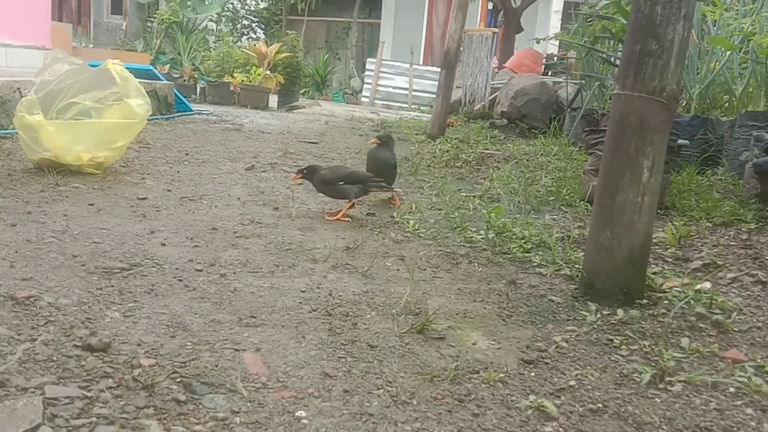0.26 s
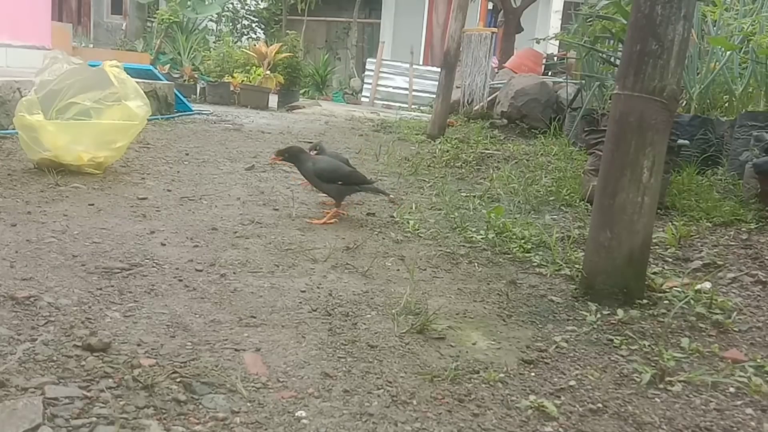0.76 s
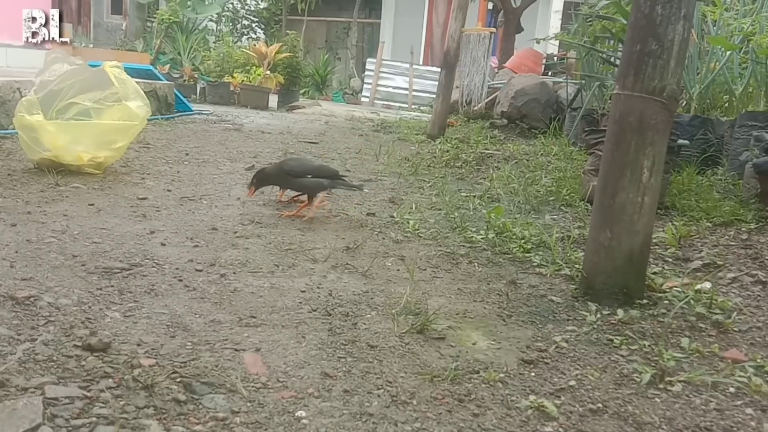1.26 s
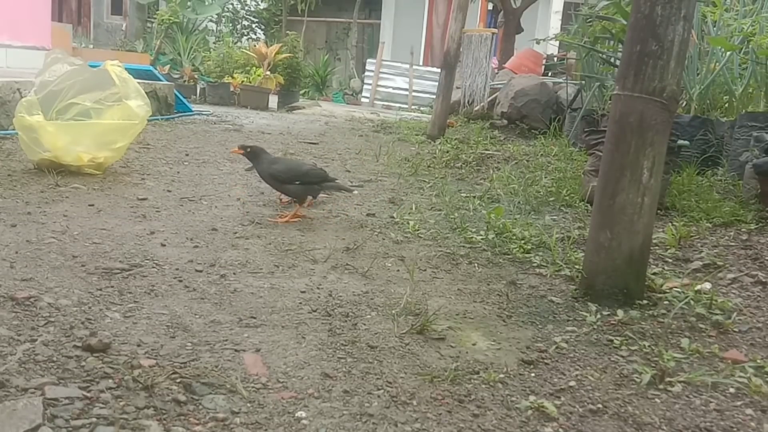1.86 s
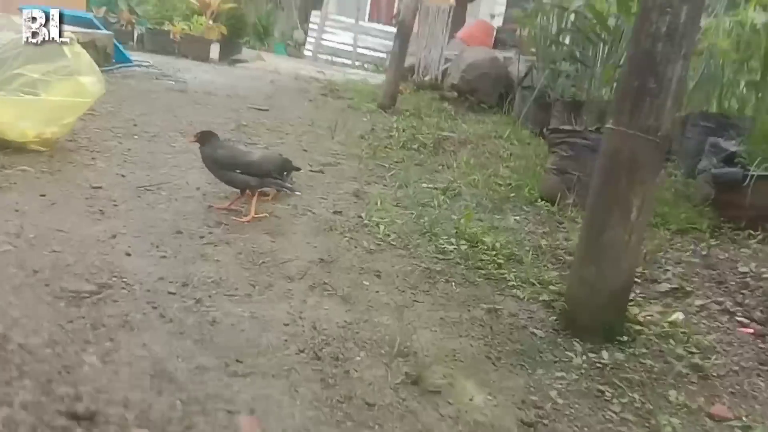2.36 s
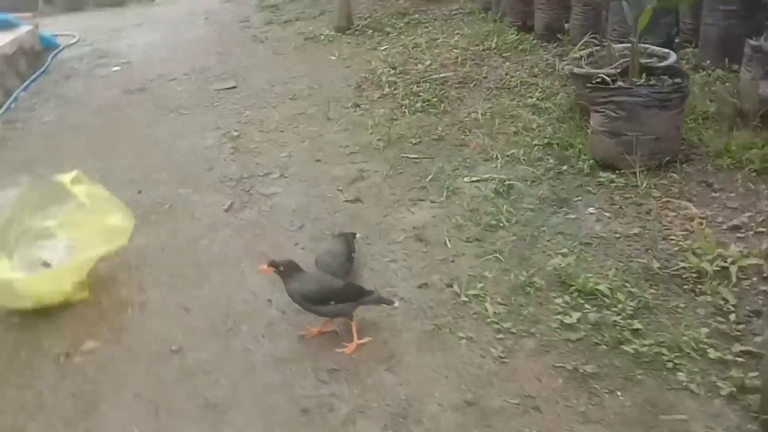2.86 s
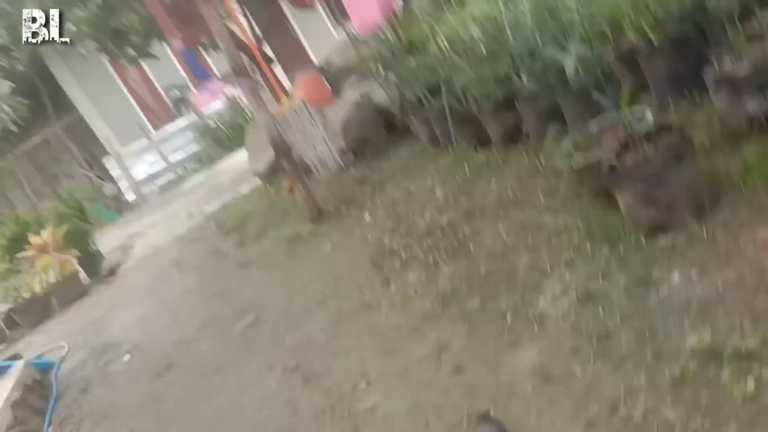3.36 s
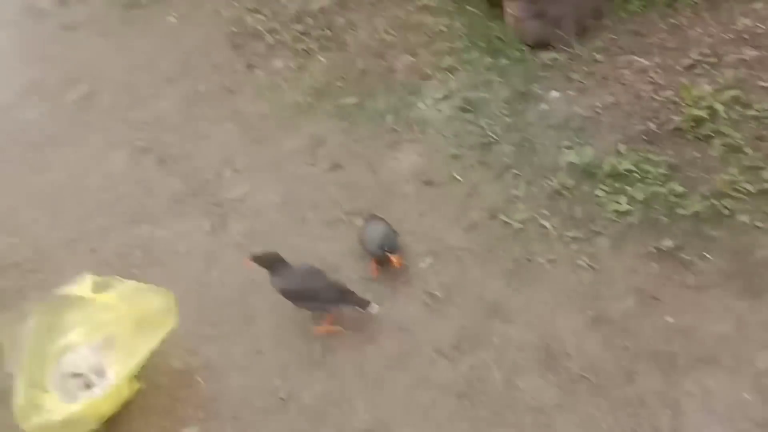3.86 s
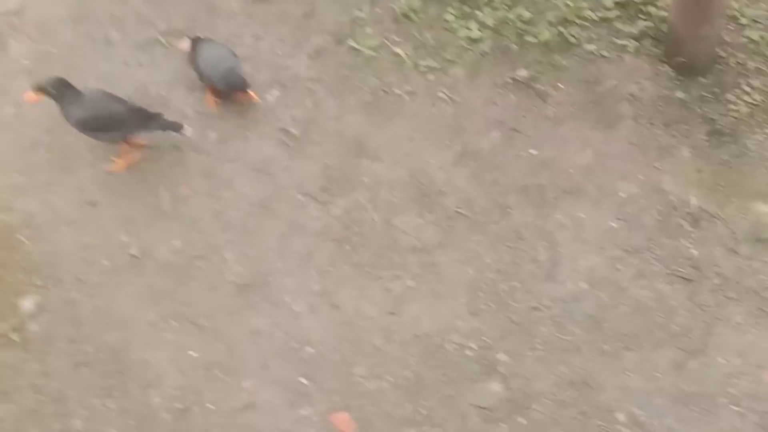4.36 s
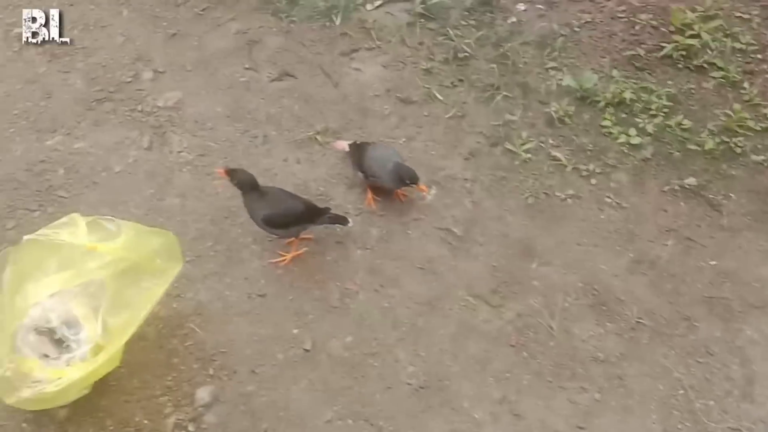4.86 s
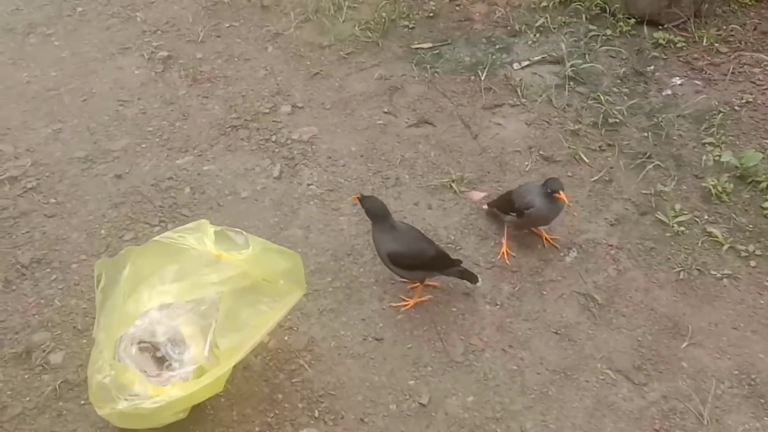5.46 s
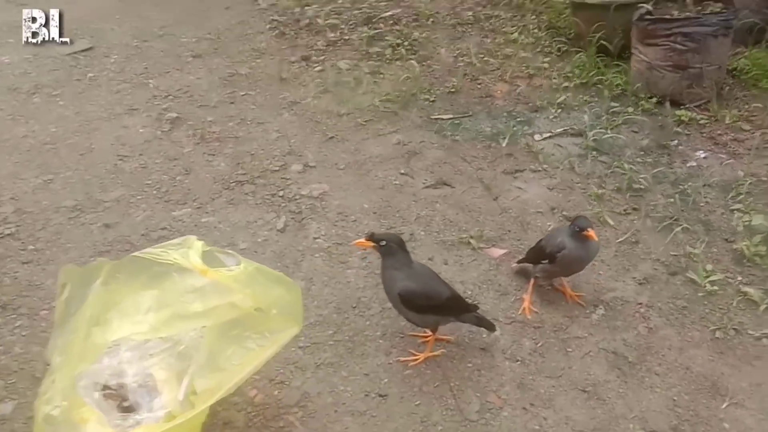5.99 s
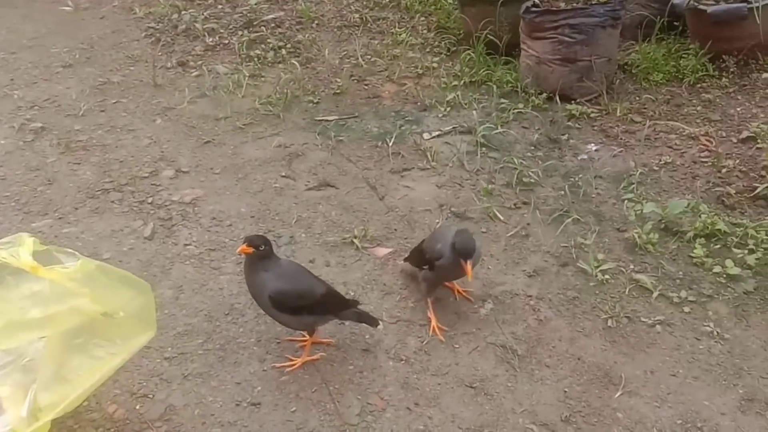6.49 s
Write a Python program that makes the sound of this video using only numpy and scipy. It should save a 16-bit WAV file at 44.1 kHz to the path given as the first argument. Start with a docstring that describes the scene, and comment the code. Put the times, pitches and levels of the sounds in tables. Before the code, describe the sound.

Two mynas whistle, squawk and screech close by in a yard, with distant chirps, crunching grit and one sharp clack.

```python
"""First come distant bird chirps and a rising squeal, while grit crunches and snaps on a dirt yard.
Then two mynas, foraging close to a hand-held phone, chip, whistle, squawk, screech and rasp.
Each call comes from a vibrating membrane in the bird's voice box; uneven flutter makes it harsh.
Something hard clacks once, a shifting grip bumps the phone, and low hums sound in the distance.
The ground and the house walls return a short echo."""
import sys
import numpy as np
from scipy import signal
from scipy.fft import rfft, irfft, next_fast_len
from scipy.io import wavfile
from scipy.ndimage import uniform_filter1d, minimum_filter1d, map_coordinates

SR = 44100
rng = np.random.default_rng(int(sys.argv[2]) if len(sys.argv) > 2 else 0)


def materialize(psi):
    """Save the field psi as 16-bit PCM at rate SR to the path in sys.argv[1].

    A 1-D psi becomes a single channel; in a 2-D psi each row is a channel.
    """
    bounded = np.clip(np.atleast_2d(psi).T, -1, 1)
    quanta = np.round(bounded * 32767).astype(np.int16)
    wavfile.write(sys.argv[1], SR, quanta)


N = 296793

# Levels are relative: the functions scale them further. Roughness runs from pure (0) to harsh (1).
# Whistles that arch up and down: (start [s], rise [s], fall [s], start pitch [Hz], top pitch [Hz],
# end pitch [Hz], peak [dB], lead-in below peak [dB], push to peak [s], overtones [dB], roughness [0-1])
MYNA_WHISTLES = [(2.28, .108, .229, 1882, 1946, 1775, -14.5, 17.5, 0.065, 0.5, 0.06),
                 (2.746, 0.019, .116, 2070, 2139, 1787, -15.5, 11.5, 0.011, 1, .1),
                 (3.959, 0.0268, 0.0665, 3950, 4020, 3710, -24, 12.5, 0.035, -11, 0.09)]
# Harsh calls, each one unbroken note: (time [s], pitch [Hz], level [dB], roughness [0-1])
SQUAWK_NOTE = [(2.428, 2590, -28, 0.95), (2.438, 2424, -18, 0.32), (2.452, 2230, -18.5, .1),
               (2.466, 2270, -6, 0.17)]
SCREECH_NOTE = [(2.464, 3270, -14, .42), (2.49, 3290, -18.5, .5), (2.505, 3796, -14.5, 0.82),
                (2.532, 3700, -19.5, .9), (2.543, 4210, -5, .33), (2.553, 4350, -15.5, .25),
                (2.557, 5220, -12.5, 0.37), (2.566, 4855, -13, 0.53), (2.58, 4670, -21, .25)]
RASP_NOTE = [(5.722, 5400, -22, 0.44), (5.732, 5450, -17, .52), (5.752, 4500, -15, 0.56),
             (5.763, 3900, -19, .75), (5.782, 5720, -12, .85), (5.805, 5350, -25, 0.78),
             (5.82, 5530, -25, .98)]
RASP_HIGH_NOTE = [(5.744, 6900, -29, .55), (5.756, 7000, -19.5, 0.6), (5.79, 6700, -26.5, 0.67)]
FAR_SQUEAL_NOTE = [(.06, 827, -53, 0.34), (.12, 1221, -36.5, 0.13), (.165, 1590, -39, 0.31),
                   (.21, 1797, -45.5, 0.51), (.275, 2620, -33.5, .75), (.305, 1662, -43, .7),
                   (.33, 1313, -39, 1.05)]
# Short slides: (start [s], length [s], start pitch [Hz], end pitch [Hz], peak [dB], roughness [0-1])
CHIP_SLIDES = [(1.651, 0.01, 5970, 5000, -27, 0.34), (3.952, 0.009, 6170, 6030, -37, 0.17),
               (5.711, 0.016, 2685, 2740, -40.5, 0.2), (5.728, .03, 2720, 2545, -44, .45),
               (6.3822, 0.01, 5740, 6180, -10.5, 0.04)]
FAR_CHIRP_SLIDES = [(.006, 0.061, 3174, 3085, -31.5, 0.27), (.066, 0.05, 4115, 4210, -33, 0.35),
                    (.185, 0.14, 3494, 3046, -26.5, 0.67), (.365, 0.063, 2500, 2220, -42.5, 0.24),
                    (.43, 0.095, 2030, 2544, -44, 0.75), (.617, 0.067, 3120, 3280, -34.5, .38),
                    (.67, .055, 3650, 3926, -36.5, 0.82), (.845, 0.03, 3120, 3400, -39, 0.62),
                    (.99, 0.032, 2985, 3180, -28.5, 0.47), (1.045, 0.059, 3410, 3340, -29.5, 0.35),
                    (1.17, 0.073, 2240, 1772, -40.5, 0.82), (1.245, 0.11, 2470, 2940, -37.5, 0.32),
                    (1.415, .1, 3110, 3030, -35.5, 0.74), (1.6, 0.031, 2860, 2576, -37.5, 0.59),
                    (1.67, 0.067, 2400, 2694, -44, .6), (2.9, 0.22, 2764, 2640, -53.5, 0.96),
                    (3.46, 0.12, 2480, 2800, -53, 0.74), (3.56, .14, 3800, 3345, -49, 0.73),
                    (3.705, 0.032, 2646, 2380, -45.5, 1), (6.04, 0.24, 2008, 2144, -58.5, 0.85),
                    (6.53, .14, 3890, 3900, -61, .4)]
# Harmonics, the tones at 1, 2, 3 ... times a call's pitch: (level [dB])
WHISTLE_HARMONICS = [-4, -30, -31.5, -38, -54, -44, -39.5]
SQUAWK_HARMONICS = [0, 5.5, -5, -5.5, -29, -33.5]
SCREECH_HARMONICS = [0, -21.5, -26.5]
RASP_HARMONICS = [0, -25]
CHIP_HARMONICS = [0, -21]
CHIRP_HARMONICS = [0, -43]
SQUEAL_HARMONICS = [5, -4, -6.5, -18, -10]
# Rushing air in a call: (frequency [Hz], level [dB])
BREATH_SPECTRUM = [(1200, -45.5), (2300, -5), (6500, 5.5), (10000, 1), (13500, -0.5), (16000, -22)]

# Sharp snaps of grit: (time [s], level [dB], low knock compared with the crack [dB])
GRIT_SNAPS = [(0.2099, -28, -14), (0.2744, -16.5, 8), (0.5715, -31, 9), (0.9825, -24, -6),
              (1.017, -18.5, -10), (1.04, -27, 14.5), (1.1234, -33, 11), (1.3597, -21, 9.5),
              (1.3781, -17, -22), (1.4303, -18, -12), (1.5683, -26, 12.5), (1.653, -21.5, 5.5),
              (1.7132, -22, -5.5), (2.0807, -23, -3.5), (2.1689, -17, -4.5), (3.2154, -25.5, 4),
              (3.265, -23.5, -2.5), (3.8507, -26.5, -16), (3.856, -17, -12), (4.4024, -34, 1),
              (4.713, -29, 5), (4.7429, -27, -15), (4.807, -30.5, -11), (5.201, -39, 1), (6.3736, -19, -25),
              (6.4675, -30.5, -4)]
# One hard clack: (time [s], peak [dB])
CLACK_HITS = [(3.7578, 0)]
# The tones that ring in the clack: (frequency [Hz], width [Hz], level [dB]); wider ones die sooner
CLACK_TONES = [(1200, 190, -12), (2580, 280, -28), (3670, 130, -1.5), (4020, 600, -22), (4630, 160, -6),
               (6070, 290, -1), (7450, 240, -14)]
# Scuffs on the dirt: (start [s], length [s], level [dB])
DIRT_SCUFFS = [(0.202, 0.25, -36), (0.428, 0.1, -41), (0.536, 0.077, -40.5), (0.975, 0.11, -37.5),
               (1.3, 0.049, -46), (1.349, 0.13, -34.5), (1.478, 0.13, -45), (1.602, 0.11, -40.5),
               (1.815, 0.024, -40.5), (1.883, 0.056, -46), (2.05, 0.15, -58.5), (2.765, 0.031, -37),
               (3.24, 0.071, -49), (3.424, 0.094, -44), (4.707, 0.019, -40), (5.063, 0.076, -40.5),
               (5.195, 0.061, -37.5), (6.51, 0.16, -55)]
# Light shuffling under the scuffs: (time [s], level [dB])
SHUFFLE_LEVELS = [(0, -65.5), (2.4, -56.5), (4.6, -59.5), (5.1, -51), (5.6, -69.5)]
# The tone of crunching dirt: (frequency [Hz], level [dB])
GRIT_SPECTRUM = [(300, -5.5), (800, -8.5), (1250, 6), (1600, 3.5), (2500, 7.5), (5500, 3), (7600, 3.5),
                 (10000, -10.5), (16000, -10)]
# Soft bumps of the hand on the phone: (time [s], pitch [Hz], level [dB])
GRIP_BUMPS = [(0.143, 234, -31.5), (0.27, 269, -41), (1.2, 672, -50), (1.64, 97.6, -24.5),
              (1.67, 318.5, -41), (1.957, 255, -42.5), (2.129, 279, -37.5), (2.2, 474, -52),
              (3.62, 323, -40.5), (3.869, 245, -38)]

# Background loudness: (time [s], rumble level [dB], open-air level [dB])
BACKGROUND_LEVELS = [(0.0, -49.5, -53.5), (0.22, -52, -52), (0.51, -42.5, -56.5), (1.27, -49.5, -53.5),
                     (2.06, -42.5, -52), (2.44, -48.5, -51.5), (2.79, -51.5, -62.5), (3.3, -51.5, -54),
                     (4.16, -52, -58), (4.46, -43.5, -60), (4.68, -53, -53), (5.38, -54, -58),
                     (5.55, -43.5, -53.5), (5.73, -44, -56), (5.98, -48, -55.5), (6.73, -44, -55)]
# Distant rumble, the murmur of open air, and hiss: (frequency [Hz], level [dB])
RUMBLE_SPECTRUM = [(15, -38), (25, -43), (68, -5), (128, 6), (178, -3), (232, -6.5), (279, -5), (306, -23),
                   (400, -19.5), (520, -44), (880, -120)]
AIR_SPECTRUM = [(150, -61), (250, -10.5), (306, 1), (361, -1), (393, -5.5), (612, -4), (750, -8),
                (1110, -12), (1250, 4.5), (1430, -21), (2500, -16), (3250, -61), (5500, -120)]
HISS_SPECTRUM = [(1500, -1), (2300, -7.5), (3000, -2), (4500, -2.5), (6100, -2.5), (7600, -4), (9000, -11),
                 (13000, -13), (16000, -11.5)]
# Low hums: (start [s], length [s], pitch [Hz], level [dB], rise [s], fade [dB per s])
LOW_HUMS = [(1.63, 2.2, 63.5, -34.5, .01, 9), (5.3, 0.83, 171.6, -38.5, 0.28, 11.5),
            (5.2, 1.4, 136, -45.5, 0.14, 5)]
# Bounces off the ground and the walls: (delay [s], level [dB])
REFLECTIONS = [(.0045, -11), (0.0159, 5), (0.023, -13.5), (.031, -10)]
# How long the echo lasts: (frequency [Hz], time to fade by 60 dB [s])
ECHO_FADE_TIMES = [(200, .25), (2000, 0.31), (5000, 0.27), (9000, 0.29), (15000, 0.024)]
# How the microphone colours the treble: (frequency [Hz], gain [dB])
MIC_RESPONSE = [(6200, 1), (6700, -4.5), (7500, 5), (8600, -2), (13000, -9), (14200, -9), (15200, 7.5),
                (15900, -24)]


def mynas():
    """Clean, wavering whistles from one side of the voice box, harsh notes from the other."""
    whistles = sum(whistle(*row) for row in MYNA_WHISTLES) * amp(1.5 * wobble(90, N))
    squawk = voice_box([SQUAWK_NOTE], SQUAWK_HARMONICS,
                       flutter_hz=1500, swing=0.11, breath_db=0, edge_s=0.0029)
    screech = voice_box([SCREECH_NOTE, upper_voice(SCREECH_NOTE)], SCREECH_HARMONICS,
                        flutter_hz=2200, swing=0.063, breath_db=-13, edge_s=0.0016)
    rasp = voice_box([RASP_NOTE, RASP_HIGH_NOTE], RASP_HARMONICS,
                     flutter_hz=3400, swing=0.109, breath_db=-13.5, edge_s=0.0012)
    rasp = filtered(rasp, lambda hz: 1 - 1 / (1 + (hz / 3200) ** 30))  # the beak passes nothing low
    chip_notes = slides(CHIP_SLIDES, rise_share=0.17, swell_db=5, fade_db=1.5, settle=0.95)
    chips = voice_box(chip_notes, CHIP_HARMONICS, flutter_hz=740, swing=0.058, breath_db=0, edge_s=0.0011)
    return whistles + squawk + screech + rasp + chips


def whistle(start, rise, fall, start_hz, top_hz, end_hz, peak_db, lead_db, push, overtones_db, rough):
    """A nearly pure note: it leads in softly, is pushed to its peak, then fades as the pitch sinks."""
    t = np.linspace(0, rise + fall, 128)
    fall_left = np.clip(1 - (t - rise) / fall, 0, 1)
    climbing_hz = start_hz + (top_hz - start_hz) * t / rise
    sinking_hz = end_hz + (top_hz - end_hz) * fall_left ** 1.6
    hz = np.where(t < rise, climbing_hz, sinking_hz)
    peak_s = rise + 0.02  # loudest just after the highest pitch
    db = peak_db - np.interp(t, [0, peak_s - push, peak_s, rise + fall], [lead_db + 8, lead_db, 0, 12])
    note = np.column_stack([start + t, hz, db, np.full_like(t, rough)])
    harmonics = np.array(WHISTLE_HARMONICS, float)
    harmonics[1:] += overtones_db
    return voice_box([note], harmonics, flutter_hz=600, swing=0.06, breath_db=-36, edge_s=0.005)


def upper_voice(note, pitch_ratio=1.91, rough=0.7):
    """A rough second voice just under an octave higher; it bursts out, weakens and gives out."""
    t = np.linspace(note[0][0], note[-1][0], 64)
    hz = curves(note, t)[0]
    burst_db = 13.5 * np.exp(-((t - t[0]) / 0.024) ** 4)
    fade_db = 16 * np.linspace(0, 1, len(t)) ** 4
    return np.column_stack([t, pitch_ratio * hz, -27.5 + burst_db - fade_db, np.full_like(t, rough)])


def slides(table, rise_share, swell_db, fade_db, settle):
    """Notes that slide to their end pitch, swelling and then fading."""
    progress = np.linspace(0, 1, 32)
    drop_db = np.interp(progress, [0, rise_share, 1], [swell_db, 0, fade_db])
    notes = []
    for start, length, start_hz, end_hz, db, rough in table:
        t = start + length * progress
        hz = end_hz + (start_hz - end_hz) * (1 - progress) ** settle
        notes.append(np.column_stack([t, hz, db - drop_db, np.full_like(t, rough)]))
    return notes


def voice_box(notes, harmonics, flutter_hz, swing, breath_db, edge_s):
    """A vibrating membrane sings each note; roughness makes its flutter deeper and faster."""
    out = np.zeros(N)
    jitter = lambda at: map_coordinates(rng.standard_normal(4096), [at], mode="mirror")
    for note in notes:
        t = np.arange(note[0][0], max(note[-1][0], note[0][0] + edge_s), 1 / SR)
        soft_edges = np.sin(np.pi / 2 * np.clip(np.minimum(t - t[0], t[-1] - t) / edge_s, 0, 1)) ** 2
        hz, db, rough = curves(note, t)
        rough = np.clip(rough, 0, 1)
        wavering_hz = hz * (1 + swing * rough * wobble(flutter_hz / 2, len(t)))
        phase = 2 * np.pi * np.cumsum(wavering_hz) / SR
        flutter_clock = np.cumsum(flutter_hz * rough) / SR
        wave = amp(breath_db) * rough * coloured(rng.standard_normal(len(t)), BREATH_SPECTRUM)
        steady = np.sqrt(1 - rough ** 2)
        for k, harmonic_db in enumerate(harmonics, 1):
            clock = flutter_clock * np.sqrt(k)  # higher harmonics flutter faster
            flutter = (jitter(clock) + 1j * jitter(clock)) / np.sqrt(2)  # shakes strength and phase
            wave += amp(harmonic_db) * np.imag((steady + rough * flutter) * np.exp(1j * k * phase))
        add(out, t[0], unit(wave) * soft_edges * amp(db))
    return out


def far_birds():
    """Hoarse chirps and one squeal that climbs and drops, pulsing unevenly across the yard."""
    notes = slides(FAR_CHIRP_SLIDES, rise_share=0.33, swell_db=3.5, fade_db=4, settle=1.3)
    chirps = voice_box(notes, CHIRP_HARMONICS, flutter_hz=1000, swing=0.046, breath_db=-35, edge_s=0.0017)
    squeal = voice_box([FAR_SQUEAL_NOTE], SQUEAL_HARMONICS,
                       flutter_hz=1100, swing=0.095, breath_db=-15, edge_s=0.0045)
    pulsing = amp(3.5 * wobble(170, N))
    return pulsing * (amp(-2) * chirps + amp(1.5) * squeal)


def snaps():
    """Grit snaps: each burst of noise gives a bright crack and a lower knock."""
    out, t = np.zeros(N), np.arange(SR // 16) / SR
    fade = amp(-60 * t / 0.011) + amp(-7 - 60 * t / 0.075)  # a fast drop and a softer tail
    for start, db, knock_db in GRIT_SNAPS:
        burst = rng.standard_normal(len(t)) * fade
        crack = passed(burst, "band", [3300, 8000])
        knock = passed(burst, "band", [1017, 1660])
        add(out, start, amp(db - 2.5) * (crack + amp(knock_db) * knock))
    return out


def clack():
    """One hard contact rings a few tones that die away quickly."""
    out, t = np.zeros(N), np.arange(SR // 16) / SR
    for start, db in CLACK_HITS:
        ring = sum(amp(level) * np.sin(2 * np.pi * hz * t) * np.exp(-np.pi * width * t)
                   for hz, width, level in CLACK_TONES)
        crack = rng.standard_normal(len(t)) * amp(-19 - 60 * t / 0.02)
        hit = passed(ring / np.abs(ring).max() + crack, "high", 1100, order=4)  # too small to make bass
        add(out, start, amp(db) * hit / np.abs(hit).max())
    return out


def crunch(grains_per_s=3000):
    """Scuffed dirt: sprays of tiny unequal grains that swell fast and thin out."""
    level = amp(curves(SHUFFLE_LEVELS, np.arange(N) / SR)[0])
    for start, length, db in DIRT_SCUFFS:
        progress = np.linspace(0, 1, round(length * SR))
        add(level, start, amp(db) * np.sin(np.pi * progress ** 0.76))
    grains = np.zeros(N)
    # Fine grit and coarse pebbles shift in separate clumps, so each band has its own spray.
    for low_hz, high_hz in [(1, 1800), (1800, 3600), (3600, 6500), (6500, SR)]:
        ticks = (rng.random(N) < grains_per_s / SR) * rng.standard_normal(N)
        size_db = 2.7 * np.minimum(rng.exponential(size=N), 4)
        clump_db = 4.07 * wobble(130, N)
        grains += filtered(ticks * amp(size_db + clump_db), lambda hz: (hz >= low_hz) & (hz < high_hz))
    return level * coloured(grains, GRIT_SPECTRUM)


def bumps(rise_s=0.0064, fade_s=0.33):
    """A shifting grip on the phone gives short, dull thuds."""
    out, t = np.zeros(N), np.arange(SR // 6) / SR
    for start, hz, db in GRIP_BUMPS:
        thud = np.sin(2 * np.pi * hz * t + 2.2 * wobble(91.3, len(t)))
        add(out, start, amp(db) * thud * (1 - np.exp(-t / rise_s)) * amp(-60 * t / fade_s))
    return out


def hums(release_s=0.35):
    """Low, distant tones that swell, waver and die away."""
    out = np.zeros(N)
    for start, length, hz, level_db, rise, fade in LOW_HUMS:
        t = np.arange(0, length, 1 / SR)
        soft_edges = np.clip(np.minimum(t / rise, (length - t) / release_s), 0, 1)
        phase = 2 * np.pi * np.cumsum(hz * (1 + 0.021 * wobble(12, len(t)))) / SR
        db = level_db - fade * np.maximum(t - rise, 0) + 3.9 * wobble(42, len(t))
        add(out, start, soft_edges * amp(db) * np.sin(phase))
    return out


def background():
    """Distant rumble, the murmur of open air and a soft, uneven hiss."""
    rumble_db, air_db = curves(BACKGROUND_LEVELS, np.arange(N) / SR)
    rumble = amp(rumble_db + 1 + 2.3 * wobble(10, N)) * coloured(rng.standard_normal(N), RUMBLE_SPECTRUM)
    air = amp(air_db + 2.5) * coloured(patchy_noise(depth_db=5.5), AIR_SPECTRUM)
    hiss = amp(-55.5 + 0.8 * wobble(6.1, N)) * coloured(patchy_noise(depth_db=4.5), HISS_SPECTRUM)
    return rumble + air + hiss


def echo(x, early_db, late_db):
    """A few bounces off the ground and walls, then a blurred tail."""
    hz, t, noise = signal.stft(rng.standard_normal(SR // 2), SR, nperseg=256)
    fade = amp(-60 * t / along(ECHO_FADE_TIMES, hz)[:, None])
    tail = signal.istft(noise * fade, SR, nperseg=256)[1]
    response = amp(late_db) * tail / np.linalg.norm(tail)
    for delay, db in REFLECTIONS:
        add(response, delay, amp([early_db + db]))
    return signal.fftconvolve(x, response)[:N]


def patchy_noise(depth_db):
    """Noise whose strength drifts in patches of frequency and time."""
    noise = signal.stft(rng.standard_normal(N), nperseg=1024)[2]
    patches = uniform_filter1d(rng.standard_normal(noise.shape), size=5, axis=0)
    patches = uniform_filter1d(patches, size=14, axis=1)
    return signal.istft(noise * amp(depth_db * unit(patches)), nperseg=1024)[1][:N]


def wobble(rate, size):
    """A smooth random curve through `rate` points a second."""
    points = np.random.default_rng(rng.integers(1 << 30)).standard_normal(int(size * rate / SR) + 4)
    return map_coordinates(points, [np.arange(size) * rate / SR])


def amp(db):
    """Turn decibels into a multiplier."""
    return 10 ** (np.asarray(db) / 20)


def unit(x):
    """Scale x to an average strength (rms) of 1."""
    return x / np.sqrt(np.mean(x ** 2) + 1e-20)


def along(points, hz):
    """Read (frequency, value) points at hz, with octaves evenly spaced."""
    frequencies, values = np.transpose(points)
    return np.interp(np.log(hz + 1), np.log(frequencies + 1), values)


def curves(rows, t):
    """Read each column after the time column at times t."""
    times, *columns = np.transpose(rows)
    return [np.interp(t, times, column) for column in columns]


def passed(x, kind, hz, order=2):
    """Keep a band of x, or its high part."""
    return signal.sosfilt(signal.butter(order, hz, kind, fs=SR, output="sos"), x)


def filtered(x, response):
    """Scale each frequency in x by response(hz)."""
    size = next_fast_len(len(x) + SR // 4)
    return irfft(rfft(x, size) * response(np.fft.rfftfreq(size, 1 / SR)), size)[:len(x)]


def coloured(x, spectrum):
    """Shape x with a spectrum table, then scale it to strength 1."""
    return unit(filtered(x, lambda hz: amp(along(spectrum, hz))))


def add(track, start, x):
    """Mix x into the track from `start` seconds."""
    part = track[max(round(start * SR), 0):][:len(x)]
    part += x[:len(part)]


def scene():
    """Mix the yard into one channel; the far birds get the most echo."""
    near, far = mynas(), far_birds()
    ground = snaps() + clack() + crunch()
    air = background() + hums()
    near = near + echo(near, early_db=-17, late_db=-10)
    far = far + echo(far, early_db=-13.5, late_db=-5.5)
    ground = ground + echo(ground, early_db=-28.5, late_db=-18.5)
    air = amp(-0.5) * air + amp(-26.5) * np.roll(air, round(0.0016 * SR))  # one close reflection
    return (near + far + ground + air + bumps())[None]


def record(dry, top_hz=15900):
    """The microphone colours the treble, a fast limiter holds the peaks, and the very top is cut."""
    x = filtered(dry[0], lambda hz: amp(along(MIC_RESPONSE, hz)))
    needed_gain = 1 / np.maximum(np.abs(x), 1)
    smooth_gain = uniform_filter1d(minimum_filter1d(needed_gain, size=89), size=89)
    return filtered(x * smooth_gain, lambda hz: hz < top_hz)[None]


dry = scene()
out = record(dry)
materialize(out)
```